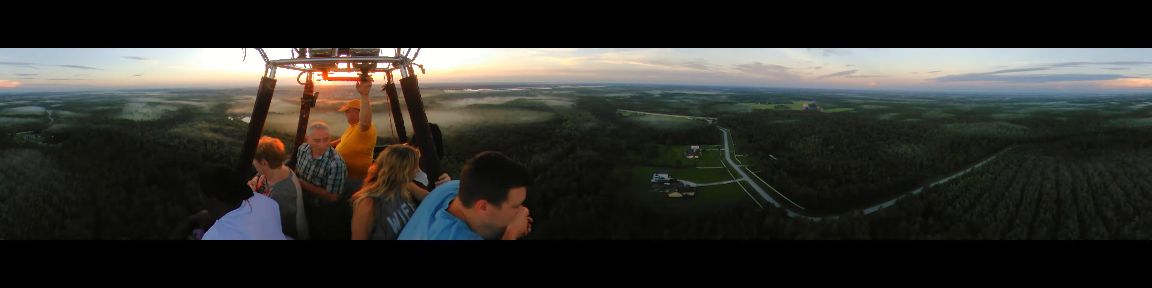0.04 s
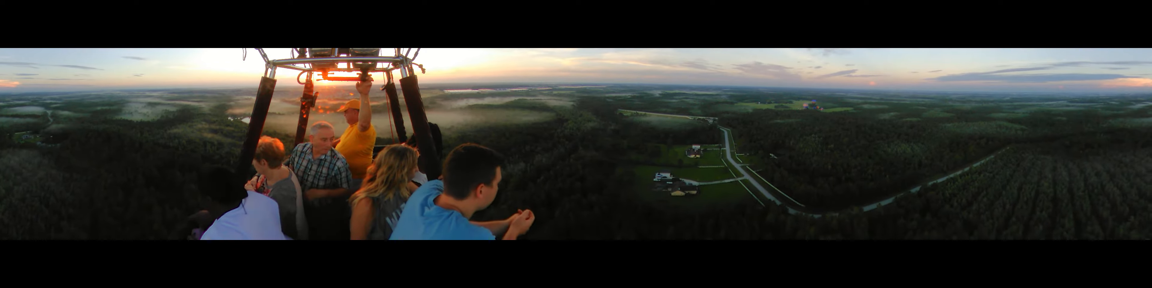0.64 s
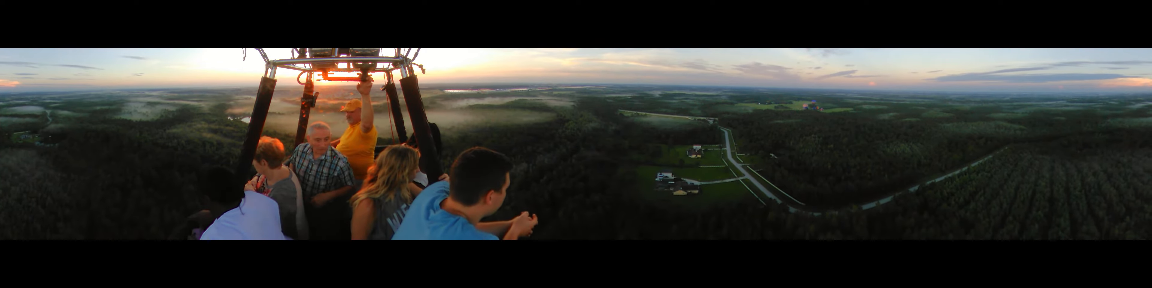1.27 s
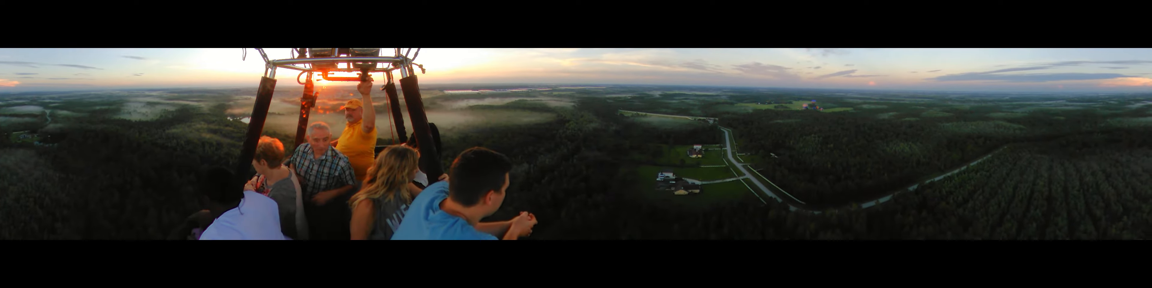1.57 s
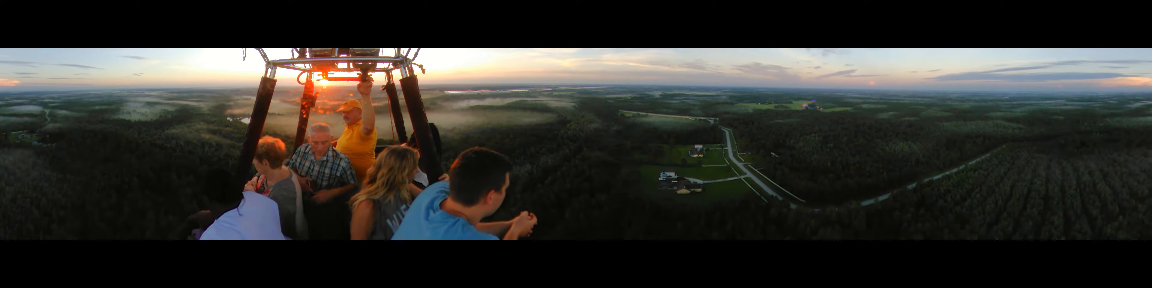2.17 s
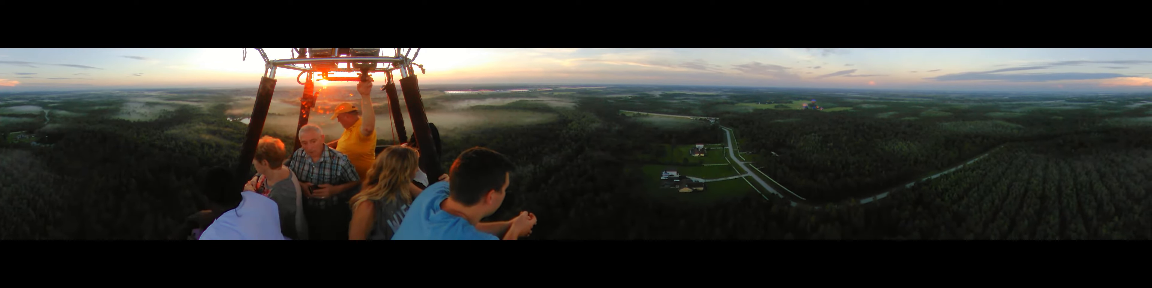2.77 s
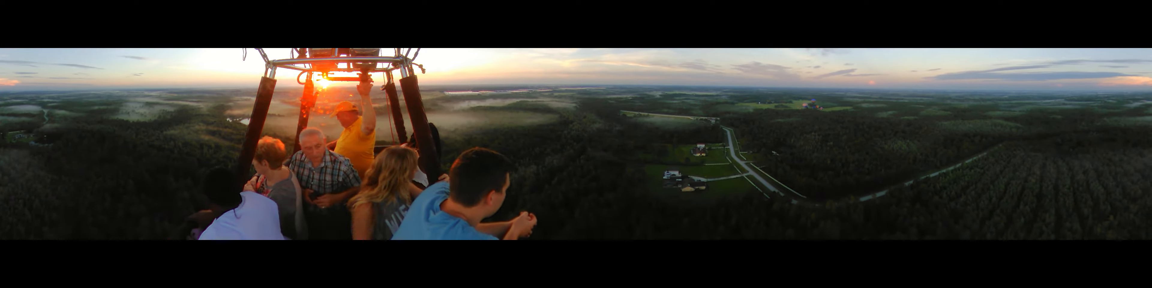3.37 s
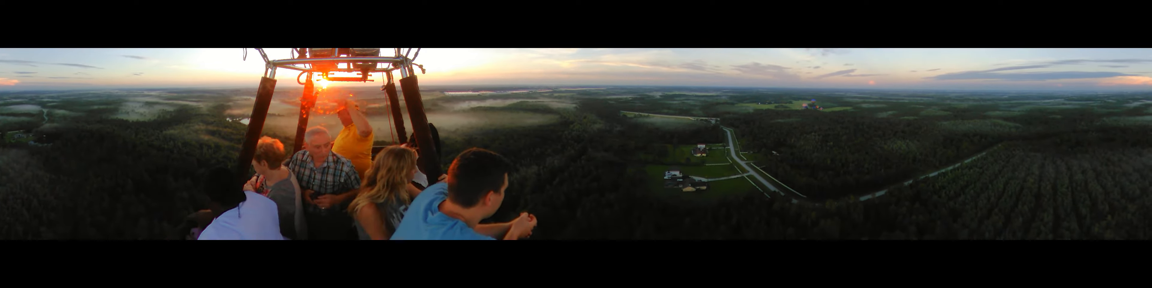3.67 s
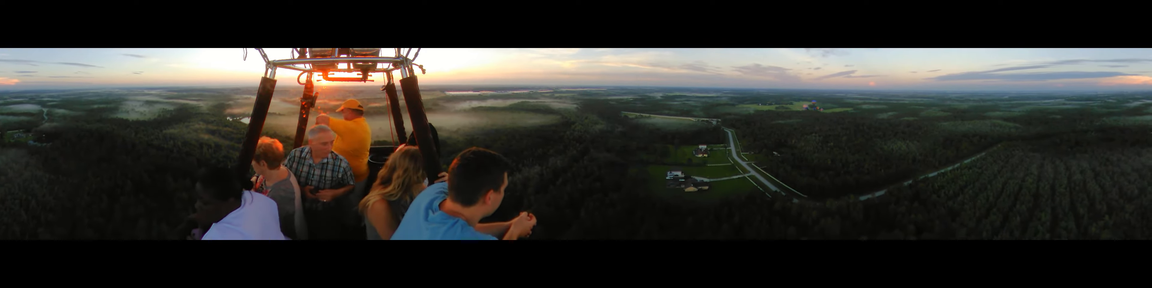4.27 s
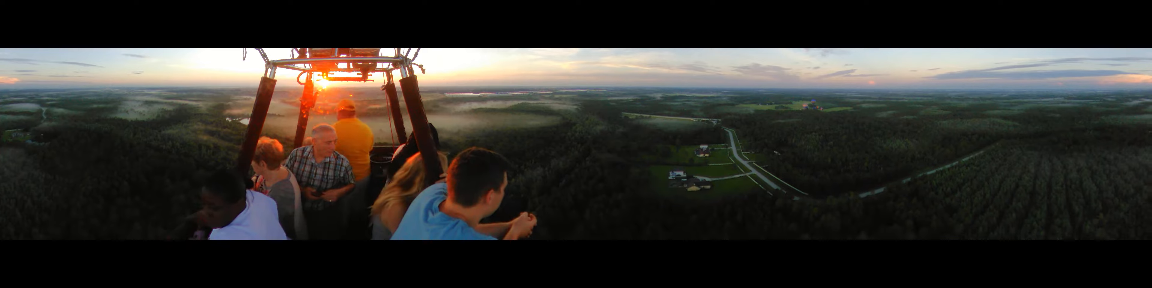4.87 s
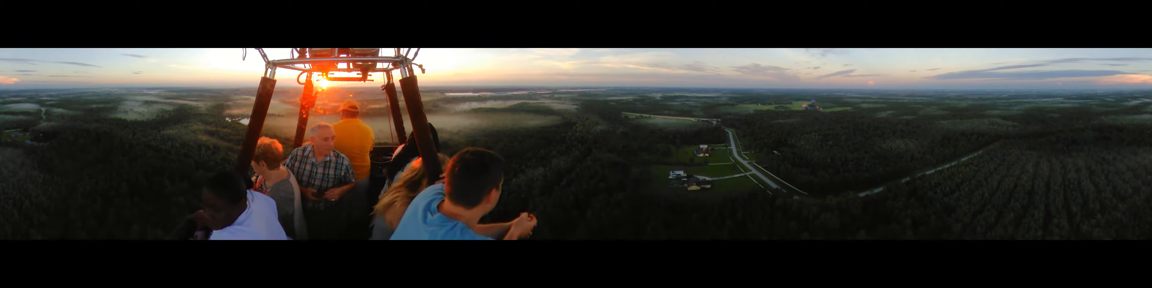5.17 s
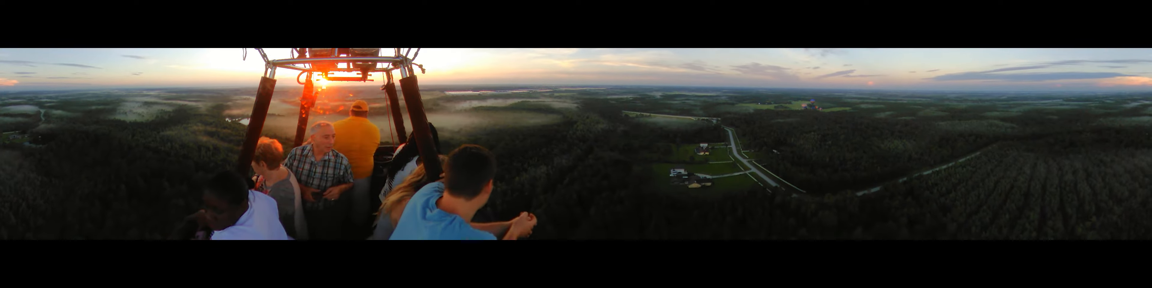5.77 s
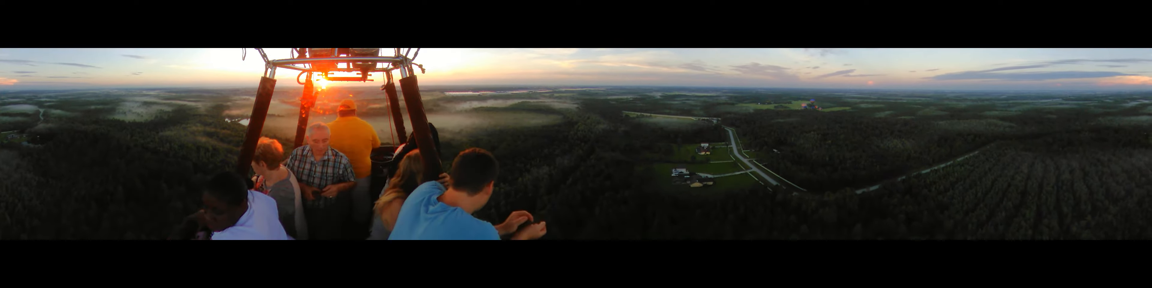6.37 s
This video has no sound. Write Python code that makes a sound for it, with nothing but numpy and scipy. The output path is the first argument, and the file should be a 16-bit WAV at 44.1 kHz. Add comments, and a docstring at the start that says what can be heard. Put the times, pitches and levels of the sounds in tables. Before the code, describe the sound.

Soft hiss of pilot flames, then a hot air balloon's propane burner lights with a whump and roars loudly for about a second.

```python
"""A soft knock and the fluttering hiss of pilot flames, beside a hot air balloon's basket in calm air.
The knocks are damped modes of a camera mount on a pole; faint rubs, squeaks and chirps come and go.
Near 3.1 s the burner lights with a low whump, as the first cloud of gas burns at once. For a second
turbulent combustion roars under the hiss of the gas jets; then the valve shuts, and a faint
rumble reverberates in the balloon overhead."""
import sys
import numpy as np
from scipy import signal
from scipy.fft import rfft, irfft
from scipy.io import wavfile
from scipy.ndimage import uniform_filter1d, minimum_filter1d

SR = 44100
rng = np.random.default_rng(int(sys.argv[2]) if len(sys.argv) > 2 else 0)


def master_out(mix):
    """Clip the mix to full scale and print it as 16-bit PCM to the path in sys.argv[1]."""
    frames = np.transpose(np.atleast_2d(mix))
    ceiling = np.clip(frames, -1, 1)
    pcm = np.round(ceiling * 32767).astype(np.int16)
    wavfile.write(sys.argv[1], SR, pcm)


N = 292824
TIME = np.arange(N) / SR
FREQS = np.fft.rfftfreq(N, 1 / SR)
CRACK_S, WIDE_S, EASE_S, SHUT_S = 3.129, 3.21, 3.688, 4.027  # valve: cracked, wide, easing, let go
GROW_S = 0.14  # time constant of flame growth and nozzle warming


def from_db(db):
    """Amplitude ratio of a level."""
    return 10 ** (np.asarray(db) / 20)

def unit(x):
    """Normalisation to rms 1."""
    return x / np.sqrt(np.mean(abs(x) ** 2) + 1e-20)

def over_hz(table):
    """Columns of a table, interpolated in log frequency."""
    hz, *columns = np.transpose(table)
    return [np.interp(np.log(FREQS + 1), np.log(hz), column) for column in columns]

def ramp(start, end):
    """Linear rise from 0 to 1."""
    return np.clip((TIME - start) / (end - start), 0, 1)

def since(s):
    """Seconds after a moment, 0 before it."""
    return np.maximum(TIME - s, 0)

def until(s):
    """Seconds before a moment, 0 after it."""
    return np.maximum(s - TIME, 0)

def arch(start, length):
    """Half-sine envelope."""
    return np.sin(np.pi * ramp(start, start + length))

def wobble(hz):
    """Random modulation: low-passed noise of rms 1."""
    return unit(irfft(rfft(rng.standard_normal(N)) / (1 + (FREQS / hz) ** 4), N))

def port_noise(spectrum, ports):
    """Partial coherence: coloured noise of rms 1 differs in level and phase at two microphone ports."""
    left, independent = rfft(rng.standard_normal((2, N)))
    side_db, coherence, lead = over_hz(ports)
    coherence = np.clip(coherence, 0, 1) / (1 + (FREQS / 6500) ** 8)
    right = (coherence * left + np.sqrt(1 - coherence ** 2) * independent) * np.exp(-1j * lead)
    shade = from_db(-side_db)
    pair = np.array([left, shade * right]) / np.hypot(1, shade)
    return unit(irfft(pair * from_db(over_hz(spectrum)[0]), N))

def narrowband(hz, width):
    """Resonance: complex noise through three poles, each `width` Hz wide, shifted up to hz."""
    pole = np.exp(-np.pi * width / SR)
    noise = rng.standard_normal(N) + 1j * rng.standard_normal(N)
    envelope = unit(signal.lfilter([1], np.poly([pole] * 3), noise))
    return np.sqrt(2) * envelope * np.exp(2j * np.pi * np.cumsum(hz * np.ones(N)) / SR)

def placed(tone, left_db, right_db, lead):
    """Level and phase differences locate a complex tone; the left port leads by `lead` rad."""
    return np.array([from_db(left_db) * tone, from_db(right_db) * tone * np.exp(-1j * lead)]).real

def aftermath(settle_s=0.69):
    """Relaxation: a weight that builds to 1 during the blast, then settles to 0."""
    return ramp(CRACK_S, SHUT_S) * np.exp(-(since(SHUT_S) / settle_s) ** 2)


# Spectra of the pilot flames: f/Hz, relative level/dB
PILOT_RUMBLE = [(15, -40), (25, -27), (41, -10), (65, -0.5), (110, 0.5), (187, -7), (239, -6.5),
                (718, -15.5), (760, -11.5), (990, -43), (1670, -120)]
PILOT_HISS = [(590, -33), (1000, -4), (1080, -10), (1170, -3.5), (1570, -8), (2050, -1.5), (2370, -1.5),
              (4390, -7), (5180, -13), (8150, -21), (14000, -24)]
# Their field at the ports: f/Hz, left minus right/dB, coherence before treble roll-off, left lead/rad
PILOT_PORTS = [(50, 3, 0.94, 0.5), (130, 2, 0.99, 0.32), (314, 1.4, 1, 0.6), (705, 3, 0.37, -0.8),
               (1090, 1.5, 0.38, -2), (1510, 1, 0.78, -4), (2660, 4.5, 0.69, -3), (3300, 2.3, 0.56, -2),
               (4120, -0.5, 0.24, 0.3), (4900, 4, 0.3, 2.5), (8500, 4.5, 1, -4), (12000, 4.3, 0.56, 7)]
# Broad peaks of the hiss: f/Hz, width/Hz, relative left and right level/dB, left lead/rad
PILOT_PEAKS = [(2790, 400, -63.5, -65.5, -2.9), (3500, 520, -61.5, -63.5, -2.3),
               (4400, 380, -64.5, -66.5, .1)]

def pilot_flames(rumble_db=-53.5, hiss_db=-55.5, peaks_db=-3.5, swell_db=2.5):
    """Combustion noise: small flames hiss and flutter, and their rumble swells with the blast."""
    rumble = port_noise(PILOT_RUMBLE, PILOT_PORTS)
    rumble *= from_db(rumble_db + swell_db * aftermath() + 0.84 * wobble(10))
    hiss = port_noise(PILOT_HISS, PILOT_PORTS) * from_db(hiss_db + 0.92 * wobble(55))
    peaks = sum(placed(narrowband(hz, width), *port) for hz, width, *port in PILOT_PEAKS)
    return rumble + hiss + from_db(peaks_db) * peaks

# Resonances of the camera housing: f/Hz, width/Hz, relative left and right level/dB, left lead/rad
HOUSING_MODES = [(652, 65, -65.5, -65.5, 1), (822, 98, -57.5, -62, -1.75), (913, 148, -53.5, -69.5, 4)]

def housing_ring(gain_db=-3, dip_db=-10.5):
    """Cavity resonance: the housing rings along, weakest as the blast ends."""
    ring = sum(placed(narrowband(hz, width), *port) for hz, width, *port in HOUSING_MODES)
    return ring * from_db(gain_db + dip_db * aftermath() + 2 * wobble(11))

def pilot_whistle(cold_hz=2020, heating_hz_per_s=65):
    """Resonant frequency rises with temperature: an airy note climbs as the blast heats the burner."""
    hz = cold_hz + heating_hz_per_s * (since(CRACK_S) - since(SHUT_S))
    note = placed(narrowband(hz, width=165), left_db=-59.5, right_db=-68, lead=3.2)
    return note * from_db(2.5 * wobble(12))

# Thin chirps: t/s, f/Hz, left level/dB
CHIRP_NOTES = [(.30, 3860, -62), (.375, 3850, -60), (.49, 3860, -58), (.56, 3840, -59), (.625, 3860, -68),
               (4.845, 3860, -62), (6.12, 3100, -55), (6.21, 3080, -54), (6.28, 3080, -62)]

def chirps(length_s=0.06):
    """Amplitude modulation of a narrow noise band: runs of notes, like birds far below."""
    starts, pitches, _ = np.transpose(CHIRP_NOTES)
    envelope = sum(from_db(db) * arch(start, length_s) for start, _, db in CHIRP_NOTES)
    carrier = narrowband(np.interp(TIME, starts, pitches), width=150)
    return placed(carrier * envelope, left_db=0, right_db=-1, lead=1.7)

# Squeaks in the basket: t/s, left level/dB
SQUEAK_NOTES = [(5.84, -66), (5.94, -69), (6.065, -62)]

def squeaks(hz=11170, length_s=0.032):
    """Pulses of one narrow noise band are heard as faint, very high squeaks."""
    envelope = sum(from_db(db) * arch(start, length_s) for start, db in SQUEAK_NOTES)
    return placed(narrowband(hz, width=780) * envelope, left_db=0, right_db=-4, lead=1)

# Rubs in the basket: t/s, duration/s, f/Hz, width/Hz, left level/dB
BASKET_RUBS = [(2.69, .03, 8000, 11000, -65), (5.225, 0.055, 4430, 4000, -51),
               (5.277, .04, 5230, 4500, -59), (5.29, 0.27, 1714, 1300, -60.5),
               (5.64, 0.024, 6000, 7000, -61), (5.90, .04, 6380, 8000, -60), (6.21, 0.092, 887, 250, -48.5),
               (6.373, .03, 9000, 8040, -66)]

def rubs():
    """Friction noise: brief brushes and scuffs as the passengers shift."""
    return sum(placed(narrowband(hz, width) * arch(start, length), db, db - 4, lead=0.87)
               for start, length, hz, width, db in BASKET_RUBS)

# Knocks: t/s, relative ring level/dB, thud level/dB, rattle time constant/s
MOUNT_KNOCKS = [(.026, -37, -64, 0.008), (1.423, -46, -48, .015), (1.679, -42, -48, 0.023),
                (1.709, -44.5, -42, 0.017), (2.107, -43, -61, 0.0051), (2.166, -39.5, -40, 0.041),
                (2.423, -66, -42.5, .015), (2.506, -43.5, -58, 0.025), (2.704, -38.5, -43, 0.035),
                (5.889, -58, -49, 0.008)]
# Modes of the mount: f/Hz, relative level/dB, T60/s, right minus left/dB
MOUNT_MODES = [(444, -6.5, 0.038, -10), (677, -9.5, 0.087, -10), (912, 3, 0.036, -23),
               (1300, -20, 0.017, -4), (2060, -16.5, 0.041, -7), (3040, -13, 0.0074, -1),
               (4300, -14, 0.019, -1)]

def knocks(thud_hz=118, thud_t60=0.24, ring_gain_db=-3):
    """Modal response: each short rattle excites the mount's damped modes, over a thud of the pole."""
    t = np.arange(SR // 4) / SR
    response = sum(from_db([[db], [db + right_db]]) * from_db(-60 * t / t60) * np.sin(2 * np.pi * hz * t)
                   for hz, db, t60, right_db in MOUNT_MODES)
    thud = np.sin(2 * np.pi * thud_hz * t) * from_db(-60 * t / thud_t60)
    out = np.zeros((2, N + len(t)))
    for start, ring_db, thud_db, fade in MOUNT_KNOCKS:
        rattle = rng.standard_normal(len(t)) * np.exp(-t / fade)
        ring = signal.fftconvolve(rattle[None], response, axes=1)[:, :len(t)]
        ring /= ring[0, :SR // 50].std()  # the first 20 ms set the level
        onset = round(start * SR)
        out[:, onset:onset + len(t)] += from_db(ring_db + ring_gain_db) * ring + from_db(thud_db) * thud
    return out[:, :N]

def balloon_reverb(blast, db=-33, t60=3.6, cutoff_hz=500):
    """Reverberation: the great fabric hollow overhead returns a faint, dull tail."""
    t = np.arange(2 * SR) / SR
    tail = rng.standard_normal(len(t)) * from_db(-60 * t / t60)
    lowpass = signal.butter(2, cutoff_hz, fs=SR, output="sos")
    response = signal.sosfilt(lowpass, tail / np.linalg.norm(tail))
    return from_db(db) * signal.fftconvolve(blast.mean(0), response)[:N]

def easing_db(eased_db=-7.5):
    """Throttling: the flow falls as the hand relaxes on the valve, slowly at first."""
    return eased_db * ramp(EASE_S, SHUT_S) ** 2

def flow_db(cracked_db=-4, open_db_per_s=720, shut_db_per_s=250):
    """The valve aperture sets the flow, in dB re wide open: it snaps on, widens, holds, eases, stops."""
    opening = cracked_db * (1 - ramp(CRACK_S, WIDE_S) ** 2) - open_db_per_s * until(CRACK_S)
    return np.maximum(opening + easing_db() - shut_db_per_s * since(SHUT_S), -100)

def ignition(start_s=3.118, rise_s=0.026, first_hz=125, last_hz=42, glide_s=0.024, db=-6):
    """Thermal expansion: the first gas burns at once, a whump that drops in pitch as the fireball grows."""
    t = since(start_s)
    cycles = last_hz * t + (first_hz - last_hz) * glide_s * (1 - np.exp(-t / glide_s))
    swell = (t / rise_s * np.exp(1 - t / rise_s)) ** 2
    return from_db(db) * swell * np.sin(2 * np.pi * cycles)

# Spectrum of the gas jets: f/Hz, relative level/dB
JET_SPECTRUM = [(400, -50), (900, -6), (1150, 1.8), (1600, -1.5), (2400, -1), (2750, -1), (3400, -0.4),
                (3950, -7), (4450, -1), (5400, -6.5), (6500, -7.5), (8000, -13), (11000, -13), (14000, -15)]
# Field of jets and flame: f/Hz, left minus right/dB, coherence before treble roll-off, left lead/rad
BLAST_PORTS = [(60, -0.2, 1, 0.055), (328, -0.3, 1, 0.4), (790, 0, 0.92, 0.93), (940, -2.5, 1, 1.5),
               (1530, 5.5, 0.66, 2.83), (2180, 4, 0.78, 2.73), (3410, 0.5, 0.78, 3.58),
               (3950, 1.5, 0.35, 5.8), (4330, -1.5, 0.88, 6.1), (5200, 7.5, 0.4, 7.7), (5700, 9, 0.5, 5.7),
               (6540, 7, 0.2, 8.2), (9000, 12.5, 0, 7.7), (12000, 15.5, 0.2, 6)]

def gas_jets(full_db=-14.5, cold_db=-5.5, spurt_db=4.5, pivot_hz=2000, top_hz=10500):
    """Jet noise: the nozzles hiss, weaker while cold and brightest in the first spurt."""
    hz, t, spectra = signal.stft(port_noise(JET_SPECTRUM, BLAST_PORTS), SR, nperseg=256)
    flow = flow_db()
    # the treble falls faster than the flow
    treble_db = np.maximum(1.4 * flow, -15) + spurt_db * arch(CRACK_S, length=0.13)
    treble_weight = np.maximum(np.log((hz + 1) / pivot_hz), 0) / np.log(top_hz / pivot_hz)
    tilt = from_db(treble_weight[:, None] * np.interp(t, TIME, treble_db))
    hiss = signal.istft(spectra * tilt, SR, nperseg=256)[1][:, :N]
    level_db = full_db + flow + cold_db * np.exp(-since(CRACK_S) / GROW_S)
    sputter_db = 0.15 * wobble(220) + 0.1 * wobble(34)
    return hiss * from_db(level_db + sputter_db)

# Spectrum of the main flame: f/Hz, relative level/dB
FLAME_SPECTRUM = [(10, -45), (25, -27), (40, -22), (60, -5), (90, 0.0), (170, -4.5), (250, -6.5),
                  (340, -4.5), (470, -10.5), (600, -11), (790, -14), (950, -23), (1300, -62), (2500, -90)]

def flame(full_db=-7, small_db=-11, catch_db_per_s=787, die_db_per_s=248, linger_s=0.0071):
    """Turbulent combustion: a deep roar grows, flutters, shrinks with the gas flow and dies."""
    growth_db = small_db * np.exp(-since(CRACK_S) / GROW_S) - catch_db_per_s * until(CRACK_S)
    fading_db = 0.84 * easing_db() - die_db_per_s * since(SHUT_S + linger_s)
    roar = port_noise(FLAME_SPECTRUM, BLAST_PORTS)
    return roar * from_db(full_db + growth_db + fading_db + 0.96 * wobble(29))

def scene(creep_db_per_s=0.7638):
    """Superposition: the blast and the small sounds, over a background that slowly grows louder."""
    blast = ignition() + flame() + gas_jets()
    reverb = balloon_reverb(blast)
    background = (pilot_flames() + housing_ring() + pilot_whistle()) * from_db(creep_db_per_s * TIME)
    return background + knocks() + rubs() + squeaks() + chirps() + reverb + blast

def record(dry, ceiling=0.95, cutoff_hz=14340):
    """Peak and band limiting: a fast gain dip holds the blast's peaks, then a low-pass follows."""
    allowed = np.minimum(1, ceiling / (abs(dry).max(0) + 1e-9))
    gain = uniform_filter1d(minimum_filter1d(allowed, size=120), size=120)
    lowpass = signal.firwin(801, cutoff_hz, window=("kaiser", 9), fs=SR)
    return signal.oaconvolve(dry * gain, lowpass[None], "same")


dry = scene()
out = record(dry)
master_out(out)
```